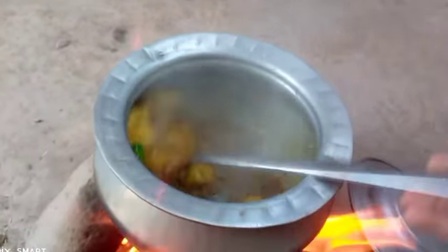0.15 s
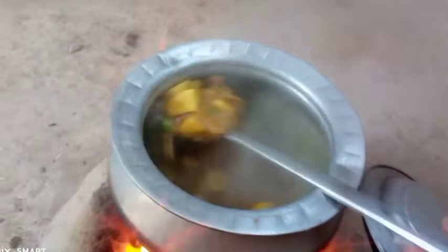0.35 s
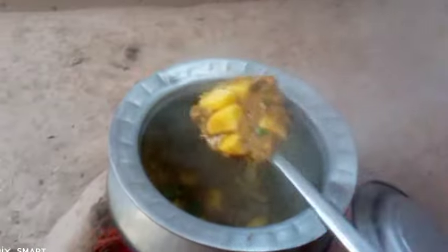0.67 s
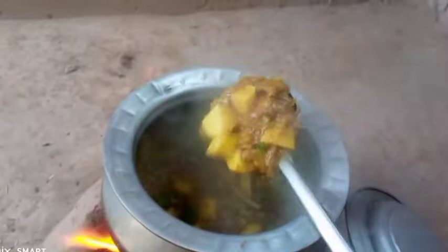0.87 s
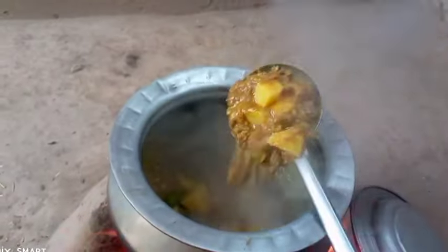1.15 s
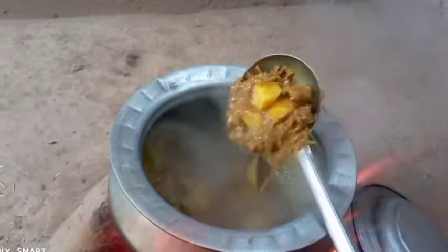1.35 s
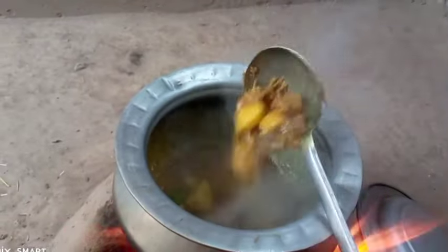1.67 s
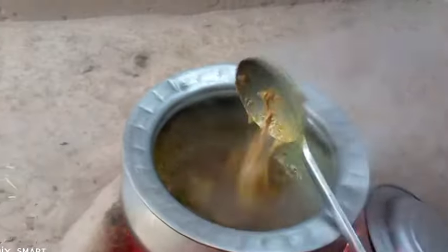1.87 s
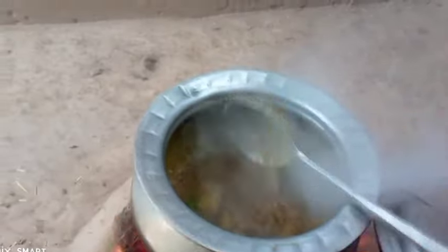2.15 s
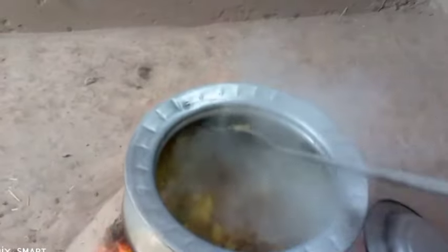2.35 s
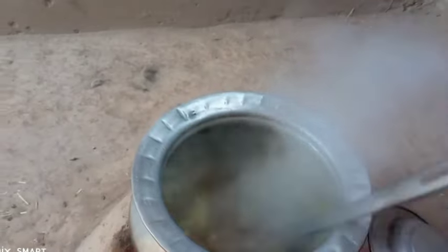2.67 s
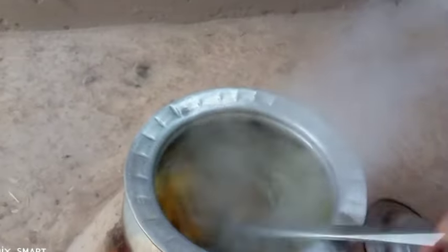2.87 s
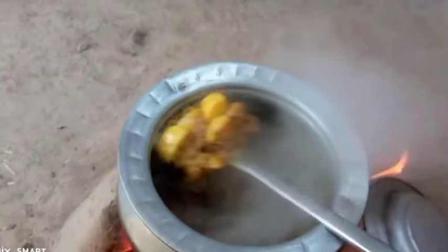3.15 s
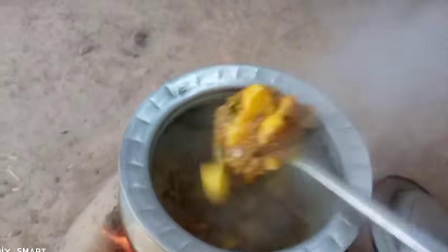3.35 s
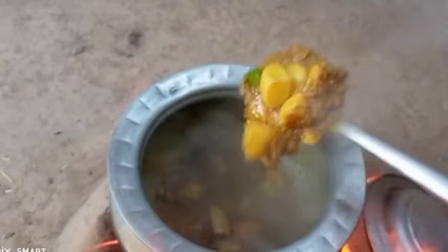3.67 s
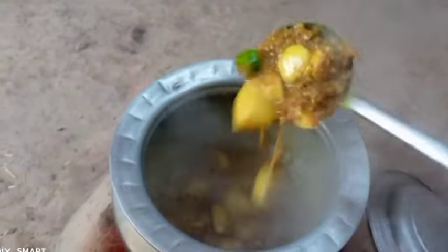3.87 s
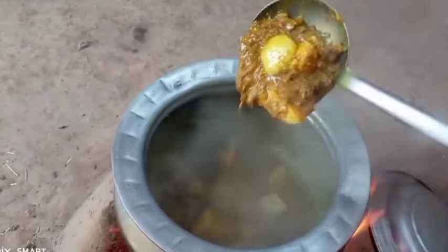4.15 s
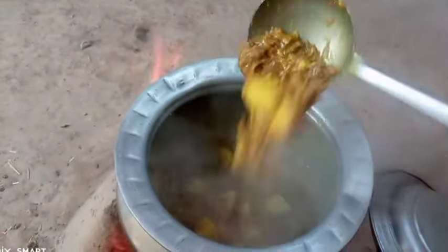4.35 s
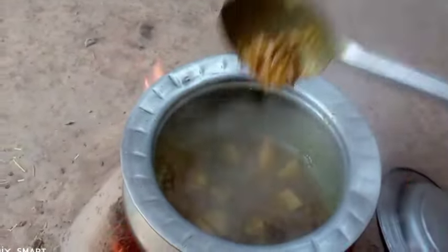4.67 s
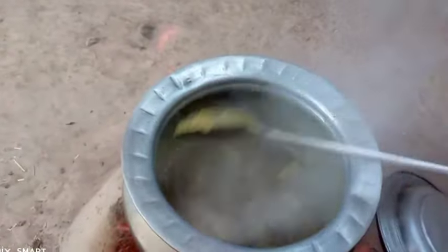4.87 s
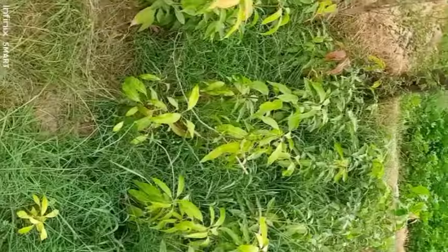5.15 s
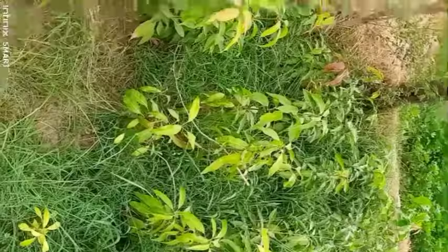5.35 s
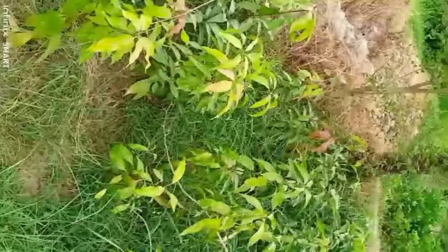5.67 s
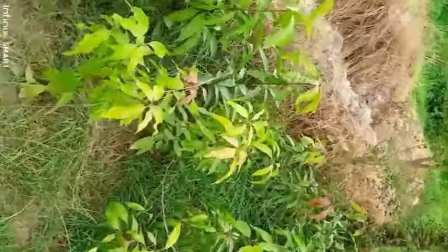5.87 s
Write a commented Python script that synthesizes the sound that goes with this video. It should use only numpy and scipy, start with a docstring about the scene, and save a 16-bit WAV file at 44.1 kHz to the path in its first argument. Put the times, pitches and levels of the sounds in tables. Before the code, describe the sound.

A steel ladle clanks and scrapes on an aluminium pot of sizzling curry over a fluttering fire, then cuts abruptly to quiet garden hiss.

```python
"""A steel ladle clanks and scrapes on an aluminium pot of potato curry, heard close: shared ringing modes.
Low thumps are sagging tones; crackles, a wet slap and the curry's sizzle are shaped noise.
Under the pot a wood fire flutters as gusts of low noise; a far motor hums as lines on one uneven speed.
In the middle of the last clank the scene changes abruptly to a quiet garden of hiss and faint tones."""
import sys
import numpy as np
from scipy import signal
from scipy.fft import rfft, irfft, next_fast_len
from scipy.io import wavfile

SR = 44100
rng = np.random.default_rng(int(sys.argv[2]) if len(sys.argv) > 2 else 0)


def wav_out(sig):
    """Save sig, one row per channel (or a flat mono array), as 16-bit PCM at SR to the path in sys.argv[1]."""
    wavfile.write(sys.argv[1], SR, np.round(np.clip(np.atleast_2d(sig).T, -1, 1) * 32767).astype(np.int16))


N = 265482
T = np.arange(N) / SR
RING = T[:SR // 2]  # time base of one short sound [s]
GARDEN_START_S, TOP_HZ = 5.4312, 15750


def undb(db):
    """Decibels to gain."""
    return np.exp(np.asarray(db) * (np.log(10) / 20))


def unit(x):
    """Scale to rms 1."""
    return x / np.sqrt(np.mean(x ** 2))


def curve(rows):
    """Join (time [s], value) points by straight lines."""
    return np.interp(T, *np.transpose(rows))


def add(out, start_s, x):
    """Mix x into out from start_s on."""
    i = int(start_s * SR)
    out[i:i + len(x)] += x[:N - i]


def noise(gain, size=N):
    """Noise of rms 1 whose spectrum follows gain(Hz)."""
    n = next_fast_len(size)
    hz = np.maximum(np.arange(n // 2 + 1) * SR / n, 1)
    spectrum = rfft(rng.standard_normal(n)) * gain(hz)
    return unit(irfft(spectrum, n)[:size])


def colour(points):
    """Gain function through (frequency [Hz], level [dB]) points, linear in log frequency."""
    hz, db = np.transpose(points)
    return lambda f: undb(np.interp(np.log(f), np.log(hz), db))


def peak(f, hz, width_hz):
    """Gain of a resonance with steep skirts."""
    return 1 / (1 + ((f * f - hz * hz) / (2 * f * width_hz) * np.sqrt(2)) ** 2)


def bass_cut(f, hz):
    """Gain of a second-order high-pass; swapped arguments give the low-pass."""
    return 1 / np.sqrt(1 + np.square(hz / f) ** 2)


def walk(rate_hz, size=N):
    """Smooth chance of spread 1, with rate_hz new values a second."""
    steps = rng.standard_normal(int(size / SR * rate_hz) + 2)
    return np.sqrt(3 / 2) * np.interp(T[:size] * rate_hz, np.arange(len(steps)), steps)


def decay(t60_s, rise_s):
    """Envelope that builds up over rise_s, then dies away."""
    build_up = 1 - np.exp(-(RING / rise_s) ** 2)
    return build_up * np.exp(-np.log(1000) * np.maximum(RING - rise_s, 0) / t60_s)


def swelling(steady_db, swells):
    """Gain of a steady sound plus rounded swells (time [s], level [dB], half-length [s]), summed as power."""
    power = undb(steady_db) ** 2
    for s, db, half_s in swells:
        power = power + (undb(db) * np.exp(-((T - s) / half_s) ** 2)) ** 2
    return np.sqrt(power)


# garden hiss spectrum: (frequency [Hz], level [dB])
GARDEN_COLOUR = [(30, -2), (120, -0.5), (330, -4.5), (500, -3.5), (1000, -9), (1800, -5), (2300, -12.5),
                 (2750, 0), (4000, -5), (5650, -4), (7400, -2), (7900, -16), (8700, -13), (10000, -11.5),
                 (12500, -27), (15500, -19)]
# centre of the brightest hiss: (time [s], frequency [Hz])
HISS_SWEEP = [(5.43, 5900), (5.65, 5850), (5.85, 5440), (6.02, 4530)]
# distant wavering tones: (frequency [Hz], width [Hz], level [dB])
FAR_TONES = [(760, 130, -72), (1400, 280, -69.5)]
# swelling narrow bands, faint far tones then hiss:
# (time of height [s], level [dB], half-length [s], frequency [Hz], width [Hz])
BAND_SWELLS = [(5.62, -63, 0.02, 732, 25), (5.728, -60.5, 0.021, 691, 30), (5.83, -63, 0.031, 1476, 86),
               (6.0, -63, 0.18, 3030, 560), (5.95, -71, 0.14, 7860, 650)]


def garden(hiss_db=-63, sweep_db=-64, sweep_width_hz=650):
    """Even hiss of leaves and insects, a noise band on a sinking carrier, faint wavering far tones."""
    hiss = noise(colour(GARDEN_COLOUR)) * undb(hiss_db + walk(97))
    carrier = np.sqrt(2) * np.sin(2 * np.pi * np.cumsum(curve(HISS_SWEEP)) / SR)
    sweep = undb(sweep_db) * carrier * noise(lambda f: 1 / (1 + (f / sweep_width_hz) ** 4))
    out = hiss + sweep
    for hz, width_hz, db in FAR_TONES:
        out += noise(lambda f: peak(f, hz, width_hz)) * undb(db + 2 * walk(30))
    for s, db, half_s, hz, width_hz in BAND_SWELLS:
        swell = np.exp(-((T - s) / half_s) ** 2)
        out += noise(lambda f: peak(f, hz, width_hz)) * undb(db) * swell
    return out


# yard air spectrum: (frequency [Hz], level [dB])
YARD_COLOUR = [(30, 3.5), (80, 7), (140, -4), (200, 3), (340, 5.5), (450, 1.5), (600, -1), (740, -7),
               (1100, -11.5), (2000, -11), (6000, -31)]


def yard_air(level_db=-67.5):
    """Steady coloured noise of the open yard."""
    return noise(colour(YARD_COLOUR)) * undb(level_db)


# motor lines: (multiple of speed, level before carry [dB])
MOTOR_LINES = [(3, -75.5), (7, -75), (9, -78), (10, -76), (13, -84.5)]
# how well the motor carries: (time [s], gain [dB])
MOTOR_CARRY = [(0, -2.5), (1.2, 3.5), (2.2, -1), (2.65, 3.5), (3.3, -7), (5.43, -7)]


def far_motor(turns_per_s=27.65, unevenness=0.008, waver_db=2.5):
    """Hum whose lines all follow one slightly uneven speed."""
    speed = turns_per_s * (1 + unevenness * walk(3) + unevenness * walk(30))
    turns = np.cumsum(speed) / SR
    hum = np.zeros(N)
    for order, db in MOTOR_LINES:
        line = np.sqrt(2) * np.sin(2 * np.pi * (round(order) * turns + rng.random()))
        hum += undb(db + waver_db * walk(14)) * line
    return hum * undb(curve(MOTOR_CARRY))


# flame rumble spectrum: (frequency [Hz], level [dB])
FLAME_COLOUR = [(20, -56), (38, -24), (56, 5.5), (80, -1.5), (110, -7), (150, -54), (400, -44)]
# flutters of the fire: (time of height [s], level [dB])
GUSTS = [(.15, -60), (1.03, -59), (1.4, -67), (1.729, -61), (2.58, -60), (2.78, -61), (4.02, -63.5),
         (4.72, -61)]


def flames(steady_db=-83, gust_half_s=0.054):
    """Low rumble of the fire under the pot, fluttering in gusts."""
    gusts = [(s, db, gust_half_s) for s, db in GUSTS]
    return noise(colour(FLAME_COLOUR)) * swelling(steady_db, gusts)


# sizzle spectrum: (frequency [Hz], level [dB])
SIZZLE_COLOUR = [(400, -107), (1100, -3), (1600, -14), (2300, -6.5), (3000, -3.5), (3700, -0.5),
                 (5500, -0.5), (7100, 7), (8200, -5.5), (9600, -9.5), (11500, -22.5), (13300, -23),
                 (15300, -10), (16000, -1.5)]
# curry turned on to hot metal: (time of height [s], level [dB], half-length [s])
FLARES = [(0, -57.5, 0.66), (1.05, -65.5, 0.33), (1.9, -65.5, 0.35), (3.05, -57, 0.28), (3.55, -62, 0.1),
          (3.873, -57.5, 0.1), (4.43, -60.5, 0.2), (4.95, -61, 0.36)]


def sizzle(steady_db=-64.5, grain_db=1.3, flicker_db=1.55, mottle_db=2.2,
           spits_per_s=25, spit_db=-15, spit_t60_s=0.046):
    """Countless steam bubbles burst in patches of changing pitch; now and then a larger one spits."""
    step = np.log(2) / 7  # seven bands an octave
    centres_hz = np.exp(np.arange(np.log(700), np.log(TOP_HZ) + step, step))
    fizz = np.zeros(N)
    for hz in centres_hz:
        band = noise(lambda f: np.sqrt(np.maximum(1 - np.abs(np.log(f / hz)) / step, 0)))
        # sqrt(hz): band width grows with pitch
        fizz += band * np.sqrt(hz) * colour(SIZZLE_COLOUR)(hz) * undb(mottle_db * walk(18))
    fizz = fizz * undb(grain_db * walk(1500) + flicker_db * walk(35))
    sizes = undb(4.0 * np.minimum(rng.exponential(size=N), 2))
    bursts = (rng.random(N) < spits_per_s / SR) * sizes
    envelope = signal.fftconvolve(bursts, decay(spit_t60_s, 0.0003))[:N]
    spit = envelope * noise(lambda f: peak(f, 6600, 2400))
    return (unit(fizz) + undb(spit_db) * unit(spit)) * swelling(steady_db, FLARES)


# quick parts of a spill from the full ladle: (time [s], level [dB])
SLAPS = [(3.3174, -39), (3.3335, -42)]
# slap resonances: (frequency [Hz], width [Hz], level [dB], t60 [s], rise [s])
SLAP_MODES = [(204, 21, -12.5, 0.32, 0.017), (300, 160, -9.5, 0.23, 0.028), (520, 97, -6.5, 0.15, 0.014),
              (702, 125, -8.5, 0.15, 0.085), (847, 83, -5.5, 0.24, 0.0025), (1070, 76, -11, 0.13, 0.0096),
              (1570, 320, 0.5, 0.16, 0.0026), (1450, 540, -2, 0.25, 0.0033),
              (1900, 110, -5.5, 0.15, 0.0058), (2290, 150, -9.5, 0.21, 0.013),
              (2910, 370, -6.5, 0.15, 0.012), (4000, 270, -18.5, 0.13, 0.025)]


def slap(grain_db=0.7):
    """Dull wet slap: noise bands, each with its own rise and decay, sharing one grain."""
    out = np.zeros(N)
    for s, db in SLAPS:
        grain = unit(undb(grain_db * walk(387, size=len(RING))))
        for hz, width_hz, mode_db, t60_s, rise_s in SLAP_MODES:
            body = noise(lambda f: peak(f, hz, width_hz) * bass_cut(2 * hz, f), size=len(RING))
            add(out, s, undb(db + mode_db) * body * grain * decay(t60_s, rise_s))
    return out


# gravy pours from the tilted ladle: (start [s], end [s], mean level of smacks [dB])
POURS = [(0.88, 1.8, -62), (3.6, 5.0, -65)]


def dribble(drops_per_s=16, smack_hz=4400, smack_t60_s=0.04, scatter_db=1.8, scatter_octaves=0.4):
    """Rows for crackles: small drops smack at uneven times, levels and pitches during each pour."""
    smacks = []
    for start_s, end_s, db in POURS:
        times = np.arange(start_s, end_s, 1 / drops_per_s)
        for s, (late, size, pitch) in zip(times, rng.standard_normal((len(times), 3))):
            drop_s = s + late / drops_per_s / 2
            drop_hz = smack_hz * 2 ** (scatter_octaves * pitch)
            smacks.append((drop_s, db + scatter_db * size, drop_hz, smack_t60_s))
    return smacks


# short crackling bursts (gravy smacks, spits, a fire crackle, the noise of a blow):
# (time [s], level [dB], centre [Hz], t60 [s])
CRACKLES = [(.88, -58, 6160, 0.3), (.96, -61, 3200, 0.099), (1.026, -56, 5300, 0.11),
            (1.4526, -52, 5800, 0.16), (1.66, -58.5, 4030, 0.09), (1.9845, -43.5, 4740, 0.053),
            (2.9389, -36, 6010, 0.015), (3.332, -54.5, 5500, 0.25), (3.569, -53, 6600, 0.073),
            (3.9306, -45.5, 5700, 0.035), (4.2598, -49.5, 8000, 0.015), (4.5138, -49.5, 11600, 0.018),
            (4.5819, -48, 7000, 0.018), (4.671, -41, 5740, 0.03), (4.692, -55, 9500, 0.03),
            (4.716, -51.5, 4400, .04)]


def crackles(relative_width=0.3, grain_db=0.5, rise_s=0.00029):
    """Short bursts of grainy band noise, dribbled drops included."""
    out = np.zeros(N)
    for s, db, hz, t60_s in list(CRACKLES) + dribble():
        band = noise(lambda f: peak(f, hz, relative_width * hz), size=len(RING))
        crackle = band * undb(grain_db * walk(980, size=len(RING)))
        add(out, s, undb(db) * unit(crackle) * decay(t60_s, rise_s))
    return out


# low thumps (lumps dropping into gravy, and the deep body of some clanks):
# (time [s], level [dB], starting pitch [Hz], t60 [s])
THUMPS = [(.016, -39, 371, 0.074), (0.5217, -19.5, 351, 0.02), (.535, -37.5, 192, 0.11),
          (.669, -53, 1087, 0.072), (1.926, -53.5, 523, 0.065), (2.8, -54.5, 353, 0.23),
          (3.404, -50, 273, 0.086), (3.558, -53, 508, 0.15), (3.638, -60, 756, 0.094),
          (3.9105, -49, 440, 0.015), (4.1119, -52.5, 382, 0.045), (4.197, -59, 1134, 0.057),
          (4.6684, -56.5, 463, 0.15), (5.182, -50.5, 183, 0.15), (5.417, -38, 335, 0.09)]


def thumps(rise_cycles=0.98, hollow_db=-15, hollow_t60_s=0.18, hollow_width=0.27, sag=0.033):
    """A low tone sags as it dies; the hollow of the pot answers with band noise."""
    out = np.zeros(N)
    for s, db, hz, t60_s in THUMPS:
        rise_s = rise_cycles / hz
        pitch_hz = hz * (1 - sag * (1 - np.exp(-RING / t60_s)))
        thump = np.sqrt(2) * np.sin(2 * np.pi * np.cumsum(pitch_hz) / SR) * decay(t60_s, rise_s)
        hollow = noise(lambda f: peak(f, hz, hollow_width * hz) * bass_cut(2 * hz, f), size=len(RING))
        hollow = hollow * decay(hollow_t60_s, rise_s)
        add(out, s, undb(db) * (thump + undb(hollow_db) * hollow))
    return out


# short gliding tones (squeaks of the sliding edge, low hums of the ladle bowl):
# (time at loudest [s], level [dB], pitch [Hz], length [s], glide [octaves/s])
GLIDING_TONES = [(.13, -55.5, 338.5, 0.17, -0.3), (.05, -55, 612, 0.12, -0.1), (.25, -63, 3700, 0.13, -0.5),
                 (.24, -62, 1238, 0.063, -1.5), (.265, -60, 2365, 0.07, 1), (1.97, -61.5, 615, 0.066, 1.1),
                 (1.989, -51, 2310, 0.016, -1), (2.12, -65.5, 1630, 0.065, 1.5),
                 (2.135, -60, 2790, 0.041, 2), (2, -61, 4690, 0.042, -0.5), (2.792, -45.5, 665, 0.022, 0.5),
                 (2.92, -60, 1616, 0.11, 0.1), (2.89, -62, 4300, 0.051, 0.5),
                 (3.012, -57.5, 1195, 0.057, -2.3), (3.015, -56, 2340, 0.025, -2),
                 (3.082, -55.5, 2305, 0.018, 1), (2.8, -60, 4070, 0.038, -0.5),
                 (3.08, -55.5, 6080, 0.12, 0), (3.26, -67, 1720, 0.06, -1.3),
                 (5.32, -54.5, 3900, 0.061, 0.5), (5.346, -50, 349, 0.027, 0.5)]


def gliding_tones(rough_hz=48, rough_share=0.007, throb_db=3.0):
    """Single rough tones that swell, glide and fade."""
    out, t = np.zeros(N), RING - RING.mean()
    for s, db, hz, length_s, glide in GLIDING_TONES:
        roughness_hz = (rough_hz + rough_share * hz) * walk(600, size=len(t))
        pitch_hz = hz * 2 ** (glide * t) + roughness_hz
        swell = np.exp(-2 * (t / length_s) ** 2) * undb(db + throb_db * walk(147.5, size=len(t)))
        tone = np.sqrt(2) * swell * np.sin(2 * np.pi * np.cumsum(pitch_hz) / SR)
        add(out, max(s + t[0], 0), tone[s + t >= 0])
    return out


def press(t, rise_s, fall_s):
    """Gain of a stroke, t seconds from its hardest press; rise and fall each span 20 dB."""
    return undb(-20 * np.minimum(np.maximum(-t / rise_s, t / fall_s), 10))


# strokes of the ladle's edge over the pot: (time of hardest press [s], level [dB],
# rise [s per 20 dB], fall [s per 20 dB], bass cut [Hz], place [0 base - 1 wall])
STROKES = [(0.034, -46, 0.14, 0.32, 1710, 1), (.25, -50, 0.56, 0.16, 2920, .3),
           (0.525, -51.5, 0.19, 0.19, 1940, 0.2), (1.05, -66.5, 0.39, 0.42, 3250, 0.56),
           (1.971, -58.5, 0.08, 0.29, 500, 0.36), (2.11, -53, 0.092, 0.11, 3230, 0.58),
           (2.65, -58, 0.18, .2, 2570, 0.55), (2.85, -53.5, 0.18, 0.18, 1400, 0.86),
           (2.97, -46, 0.18, 0.094, 3400, 0.49), (3.091, -57.5, 0.059, 0.2, 4560, 0.052),
           (3.18, -56.5, 0.077, 0.16, 3030, .5), (5.289, -46, 0.065, 0.16, 4140, 0.12),
           (5.369, -47.5, 0.12, 0.11, 1890, 0.43), (5.431, -37, 0.071, .1, 600, 0.58)]


def stroking():
    """Gain, bass cut [Hz] and place of the sliding edge; the strongest stroke weighs most."""
    power = np.array([(undb(db) * press(T - s, rise_s, fall_s)) ** 2
                      for s, db, rise_s, fall_s, _, _ in STROKES])
    total = power.sum(axis=0)
    cut_hz, place = np.transpose(STROKES)[-2:] @ power / total
    return np.sqrt(total), cut_hz, np.clip(place, 0, 1)


# ladle modes: (frequency [Hz], level [dB], t60 when struck [s])
LADLE_MODES = [(180, -13, .1), (358, -0.5, .13), (452, -3, .08), (1135, -16, .09), (1439, -11, .34),
               (1475, -16, .18), (2380, -14, .07), (2650, -13, .06), (4264, -9, .1), (4500, -12, .1),
               (4647, -15, .15), (5535, -14, .1), (5812, -9, .11), (6105, 0, .1), (6391, -2, .09),
               (6525, -3, .08), (6793, -4, .1), (6914, -9, .08), (7810, -12, .06), (8135, -8, .06),
               (8580, -16, .05), (10100, -21, .05), (11250, -23, .05), (15300, -24, .05)]


def rasp(cut_hz=4200, width_hz=50, grit_db=2):
    """The gritty slide keeps the ladle's own high modes ringing."""
    def spectrum(f):
        power = sum((undb(db) * peak(f, hz, width_hz)) ** 2 for hz, db, _ in LADLE_MODES)
        return np.sqrt(power) * bass_cut(f, cut_hz)
    return unit(noise(spectrum) * undb(grit_db * walk(500)))


# pot modes: (frequency [Hz], level struck on base [dB], level struck on wall [dB], t60 when struck [s])
POT_MODES = [(335, -3, -18, .09), (490, -11, -19, .09), (660, -14, -5.5, .14), (1040, 2.5, -10, .09),
             (1112, -8, -4, .12), (1568, -9, -4, .27), (1640, 0, -7, .1), (1755, -4, -7, .16),
             (2058, -6, -13, .16), (2436, -7, 0, .16), (2608, -4, -11, .12), (2780, -7, -9, .25),
             (2930, -16, -12, .2), (3400, -12, -20, .1), (3560, -13, -6, .11), (3895, -9, -13, .14),
             (4266, -8, -3, .15), (4502, -1, -13, .1), (4649, -6, -4, .27), (5070, -7, -8, .11),
             (5267, -5, -5, .17), (5560, 0, -16, .09), (5810, -5, -12, .12), (6070, 1, -17, .11),
             (6310, -12, -8, .14), (6835, -4, -11, .11), (7060, -7, -11, .12), (7360, -7, -7, .13),
             (7720, -12, -25, .08), (7950, -10, -21, .1), (11250, -31, -38, .08), (15100, -29, -33, .08)]


def scrape(slips_per_s=2500, size_db=2.5, wander_db=4, damping=2.8, lowest_hz=230, catch_db=1.2, rasp_db=-7):
    """Tiny slips ring the pot; the edge favours mode after mode, catches unevenly and rasps."""
    slips = (rng.random(N) < slips_per_s / SR) * rng.standard_normal(N)
    pulses = slips * undb(size_db * np.minimum(rng.exponential(size=N), 3))
    pulses = signal.sosfilt(signal.butter(2, lowest_hz, "high", fs=SR, output="sos"), pulses)
    gain, cut_hz, place = stroking()
    out, power = 0, 0
    for hz, base_db, wall_db, t60_s in POT_MODES:
        # the pressed ladle shortens the ring
        pole = np.exp((2j * np.pi * hz - damping * np.log(1000) / t60_s) / SR)
        ring = signal.lfilter([1], [1, -pole], pulses)
        # the travelling load bends each mode its own way
        bend = 2 * np.pi * np.cumsum((20 + .005 * hz) * walk(16)) / SR
        bent = unit(ring.imag * np.cos(bend) + ring.real * np.sin(bend))
        mode_db = base_db + place * (wall_db - base_db) + wander_db * walk(20)
        share = undb(mode_db) * bass_cut(hz, cut_hz)
        out = out + bent * share
        power = power + share ** 2
    slide = out / np.sqrt(power) + undb(rasp_db) * rasp()
    return unit(slide * undb(catch_db * walk(300))) * gain


def pot_modes(place):
    """Pot modes (Hz, dB, t60) for a contact between base (0) and wall (1)."""
    hz, base_db, wall_db, t60_s = np.transpose(POT_MODES)
    return np.transpose([hz, base_db + np.clip(place, 0, 1) * (wall_db - base_db), t60_s])


def favour(modes, favoured_hz, boost_db, width_hz=160):
    """Bring out the modes near one frequency."""
    hz, db, t60_s = np.transpose(modes)
    return np.transpose([hz, db + boost_db * peak(hz, favoured_hz, width_hz), t60_s])


def strike(modes, cut_hz, hardness_db, contact_s, clash_db, scatter_db=1,
           clash_width_hz=90, clash_t60_s=0.084, tail_db=-15, tail_t60_s=0.21):
    """Struck metal: clean modes, plus a brief noisy clash that smears them."""
    hz, db, t60_s = np.transpose(modes)
    mode_db = db + hardness_db * np.log2(hz) + scatter_db * rng.standard_normal(len(hz))
    gain = undb(mode_db) * bass_cut(hz, cut_hz)
    gain = gain / np.sqrt(np.sum(gain ** 2) / 2)
    phase = rng.uniform(0, 2 * np.pi, len(hz))
    ring = sum(g * decay(d, contact_s) * np.sin(2 * np.pi * f * RING + p)
               for f, g, d, p in zip(hz, gain, t60_s, phase))

    def smeared(f):
        return np.sqrt(sum((g * peak(f, h, clash_width_hz)) ** 2 for h, g in zip(hz, gain)))
    chatter = undb(clash_db) * decay(clash_t60_s, contact_s)
    tail = undb(tail_db) * decay(tail_t60_s, contact_s)
    return ring + noise(smeared, size=len(RING)) * (chatter + tail)


# metallic clanks, and small bright ticks near 4.5-4.7 s:
# (time [s], pot level [dB], ladle level [dB], place [0 base - 1 wall], bass cut [Hz],
# hardness [dB/octave], contact [s], clash level [dB], favoured resonance [Hz], its boost [dB])
CLANKS = [(0.015, -41.5, -42.5, 0.15, 1400, 3.5, 0.0061, 0, 5560, 7),
          (0.034, -45, -55, 0.23, 1400, 1.5, 0.0022, -2, 2780, 8),
          (0.093, -45.5, -62, 0.71, 1200, -0.5, 0.0027, -8, 3480, 19),
          (0.1338, -51, -60, .2, 1400, -5, 0.0018, -2, 5560, 12),
          (2.7064, -37, -55, 1, 1000, -1, 0.0015, -5.5, 3540, 11),
          (2.733, -34, -63, 0.85, 920, 1, 0.0021, -0.5, 1570, 5.5),
          (2.780, -34, -48.5, 1, 450, 1, 0.0028, 3, 4400, 5),
          (2.9388, -39, -46, 0.59, 1300, 4.5, 0.00049, 7.5, 5540, 9),
          (4.5117, -53.5, -58.5, 0.12, 3060, 3, 0.001, 7.5, 4500, 13),
          (4.6674, -48.5, -60, 0.2, 3200, 3.5, 0.0021, 1, 4500, 12.5),
          (4.691, -53, -60, .2, 3000, 10, 0.0018, -1, 5850, 17),
          (5.178, -48, -25.5, 0.73, 120, 0.5, 0.0032, -9.5, 2450, 6),
          (5.4033, -30.5, -43.5, 0.12, 523, -0.4, 0.0018, 1, 1760, 2)]


def clanks(tick_db=-14, tick_t60_s=0.097):
    """Each clank or tick sums pot modes, ladle modes and a bright touch of noise."""
    out = np.zeros(N)
    for s, pot_db, ladle_db, place, cut_hz, hardness_db, contact_s, clash_db, favoured_hz, boost_db in CLANKS:
        contact = cut_hz, hardness_db, contact_s, clash_db
        tick = undb(tick_db) * rng.standard_normal(len(RING)) * decay(tick_t60_s, contact_s)
        pot = strike(favour(pot_modes(place), favoured_hz, boost_db), *contact)
        ladle = strike(favour(LADLE_MODES, favoured_hz, boost_db), *contact)
        add(out, s, undb(pot_db) * pot + undb(ladle_db) * (ladle + tick))
    return out


def scene():
    """The hearth, then abruptly the garden."""
    yard = yard_air() + far_motor() + flames()
    wet_and_low = sizzle() + slap() + crackles() + thumps()
    metal = gliding_tones() + scrape() + clanks()
    hearth = yard + wet_and_low + metal
    return np.where(T < GARDEN_START_S, hearth, garden())[None]


def record(dry):
    """Drop the deepest rumble, cut steeply above TOP_HZ."""
    thin = signal.sosfilt(signal.butter(3, 36, "high", fs=SR, output="sos"), dry)
    return signal.sosfilt(signal.ellip(10, .2, 70, TOP_HZ, fs=SR, output="sos"), thin)


dry = scene()
out = record(dry)
wav_out(out)
```